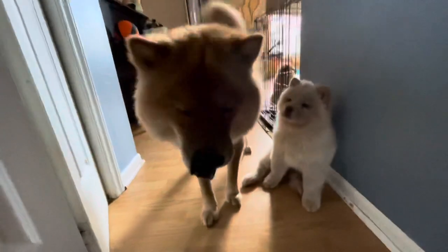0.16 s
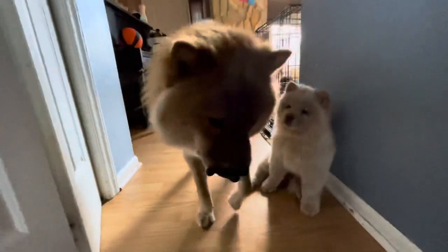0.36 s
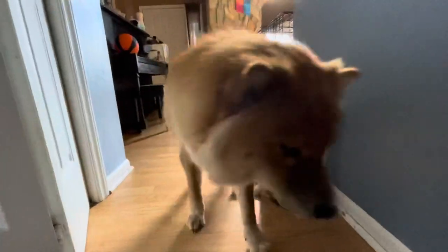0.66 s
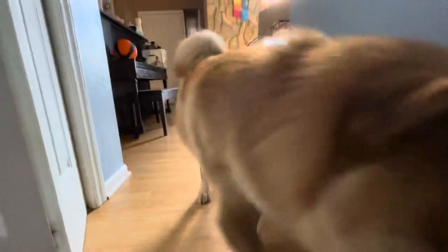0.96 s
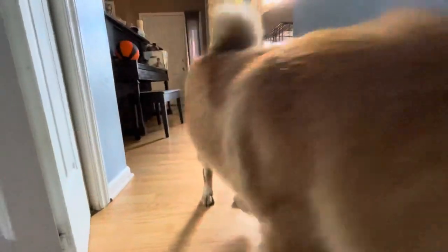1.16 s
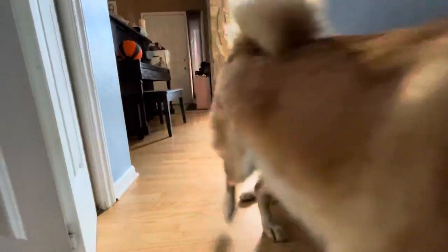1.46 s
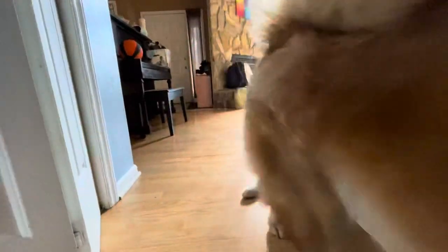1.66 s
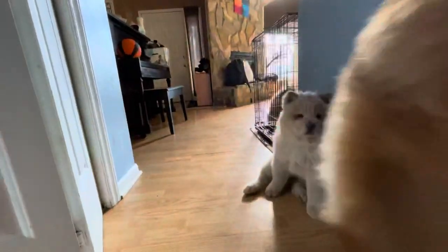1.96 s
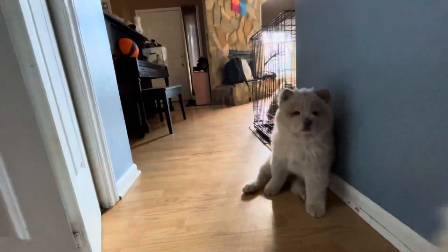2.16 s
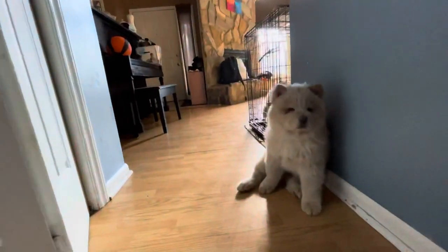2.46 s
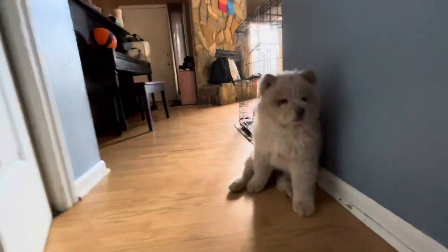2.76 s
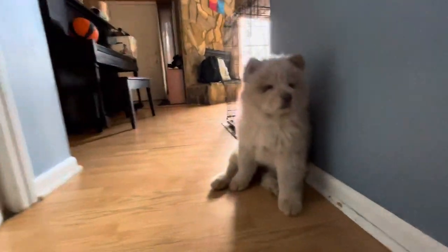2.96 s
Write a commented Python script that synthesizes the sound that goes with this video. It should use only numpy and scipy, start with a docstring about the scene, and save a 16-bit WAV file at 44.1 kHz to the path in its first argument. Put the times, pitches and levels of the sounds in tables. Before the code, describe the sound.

Dog claws click and skid unevenly on a wooden hallway floor, with soft paw thumps beneath.

```python
"""First the hissing, mid-toned tail of an earlier contact dies away over a low rumble.
Then a big dog runs on a wooden hallway floor: claws click and skid unevenly as coloured noise bursts
with short rings, at the two microphone ports. Paw pads, taps and a hollow board are damped swings.
The hallway answers every contact from 3.4 ms on, about 1.2 m of extra path, with decaying noise.
The ports differ in level, and in a phase lag that broadly grows with frequency."""
import sys
import numpy as np
from scipy import signal
from scipy.fft import rfft, irfft, next_fast_len
from scipy.io import wavfile
from scipy.ndimage import uniform_filter1d, map_coordinates

SR = 44100
rng = np.random.default_rng(int(sys.argv[2]) if len(sys.argv) > 2 else 0)


def master(y):
    """Save y as 16-bit WAV."""
    cut = np.clip(np.atleast_2d(y).T, -1, 1)
    pcm = np.round(cut * 32767)  # scale
    wavfile.write(sys.argv[1], SR, pcm.astype(np.int16))


N = 136710  # samples, 3.1 s


def amp(db):
    """Decibels to gain."""
    return 10 ** (np.asarray(db) / 20)


def unit(x):
    """Scale to rms 1."""
    return x / np.sqrt(np.mean(x ** 2) + 1e-20)


def along(points, hz):
    """Read a (frequency, value) table on a log frequency axis."""
    f, values = np.transpose(points)
    return np.interp(np.log(hz + 1), np.log(f + 1), values)


def wobble(rate, size):
    """A smooth random curve with rate knots a second."""
    knots = rng.standard_normal(int(size * rate / SR) + 4)
    return map_coordinates(knots, [np.arange(size) * rate / SR])


def filtered(x, response):
    """Multiply the spectrum of x by a response of frequency, which may turn phase."""
    m = next_fast_len(x.shape[-1] + 2048)
    spectrum = rfft(x, m) * response(np.fft.rfftfreq(m, 1 / SR))
    return irfft(spectrum, m)[..., :x.shape[-1]]


def add(track, start_s, sound):
    """Mix a sound into the track at start_s seconds."""
    part = track[..., round(start_s * SR):round(start_s * SR) + sound.shape[-1]]
    part += sound[..., :part.shape[-1]]


# How alike noise reaches the two microphone ports: (frequency [Hz], correlation [0-1])
PORT_LIKENESS = [(60, .85), (150, .75), (300, .3), (600, .45), (2500, .62), (5000, .6), (8500, .9),
                 (10500, .8), (12000, .62)]


def port_noise(level_db, size, alike=1):
    """Two-port noise of rms 1: a shared part and an opposed part set how alike the ports are."""
    def shared_and_opposed(hz):
        turn = np.arccos(np.clip(alike * along(PORT_LIKENESS, hz), 0, 1)) / 2
        return amp(level_db(hz)) * [np.cos(turn), np.sin(turn)]
    mid, side = filtered(rng.standard_normal((2, size)), shared_and_opposed)
    return unit(np.array([mid + side, mid - side]))


def patchy(x, depth_db):
    """Random gain in small patches of time and frequency makes steady noise uneven."""
    z = signal.stft(x, nperseg=1024)[2]
    field = uniform_filter1d(rng.standard_normal(z.shape[1:]), size=4, axis=0)
    field = uniform_filter1d(field, size=3, axis=1)
    return unit(signal.istft(z * amp(depth_db * unit(field)), nperseg=1024)[1][:, :N])


# Background level, at first the tail of an earlier contact:
# (time [s], hiss level [dB], mid band level [dB])
AIR_LEVELS = [(0, -50, -52.5), (.1, -52.5, -62), (.17, -60, -66), (.3, -61, -73.5), (.45, -57.5, -66),
              (0.597, -69.5, -71), (.72, -53, -58.5), (.87, -73.5, -84), (.93, -63.5, -69.5),
              (1.25, -59, -60), (1.44, -61.5, -68), (1.6, -57.5, -72), (2.05, -60.5, -57.5),
              (2.25, -62, -69), (2.45, -57, -61.5), (2.59, -62.5, -74), (2.75, -58.5, -62.5),
              (3.1, -67, -70.5)]
# Colours of hiss, mid band and rumble: (frequency [Hz], relative level per Hz [dB])
HISS_COLOUR = [(1200, -79), (2000, -3.5), (3500, -2.5), (5500, -0.5), (8000, -4.5), (10800, -5),
               (12500, -4.5)]
MID_COLOUR = [(150, -2.5), (260, -6), (400, 0.5), (650, -2), (1100, -5.5), (2000, -17.5), (3000, -49)]
RUMBLE_COLOUR = [(25, -44), (38, -2), (52, 0), (110, 2), (150, -9.5), (260, -21), (400, -106)]
RUMBLE_DB = -61


def air():
    """Hiss, a lumpy mid band and rumble: coloured noise layers, each swelling on its own."""
    times, hiss_db, mid_db = np.transpose(AIR_LEVELS)
    rumble_db = np.full(len(times), RUMBLE_DB)
    # level, colour, swell spread in dB, patch spread in dB
    layers = [(hiss_db, HISS_COLOUR, 1.2, 1.5), (mid_db, MID_COLOUR, 3, 5),
              (rumble_db, RUMBLE_COLOUR, 1.3, 1.3)]
    out = np.zeros((2, N))
    for levels_db, colour, swell_db, patch_db in layers:
        noise = port_noise(lambda hz: along(colour, hz), size=N)
        level_db = np.interp(np.arange(N) / SR, times, levels_db)
        gain = amp(level_db + swell_db * wobble(21, size=N))
        out += gain * patchy(noise, patch_db)
    return out


# Decay of the hallway's answer: (frequency [Hz], time to fall 60 dB [s])
HALL_DECAY = [(60, 0.19), (500, 0.19), (2000, 0.31), (5000, 0.29), (11000, 0.14)]
HALL_DELAY_S = 0.0034
HALL_ALIKE = .6  # the answer reaches the ports less alike than the direct sound
GRAIN_DB = 2  # spread of separate echoes in the tail


def hallway(sources):
    """The answer is decaying noise, each frequency at its own speed; each quarter second gets a new tail."""
    out, step = np.zeros((2, N)), SR // 4
    for start in range(0, N, step):
        noise = port_noise(lambda hz: 0 * hz, size=SR // 2, alike=HALL_ALIKE)
        hz, t, z = signal.stft(noise, SR, nperseg=256)
        decay = amp(-60 * t / along(HALL_DECAY, hz)[:, None])
        tail = signal.istft(z * decay, SR, nperseg=256)[1]
        tail = tail * amp(GRAIN_DB * wobble(142, size=tail.shape[1]))
        tail = tail / np.linalg.norm(tail[0])
        heard = sources[:, start:start + step].mean(0)[None]
        add(out, start / SR + HALL_DELAY_S, signal.fftconvolve(heard, tail, axes=1))
    return out


def knock(hz, t60, rise_s, sag):
    """A damped swing of the boards that starts the share sag sharp and settles to hz."""
    t = np.arange(SR // 3) / SR
    pitch = hz * (1 + sag * np.exp(-t * hz / 2))
    swing = np.sin(2 * np.pi * np.cumsum(pitch) / SR)
    return swing * amp(-60 * t / t60) * (1 - np.exp(-t / rise_s))


# A claw touching a hollow board: (time [s], level [dB])
TOUCH_TIMES = [(0.35, -46.5), (.3605, -50)]
# Modes of the hollow board: (frequency [Hz], relative level [dB])
HOLLOW_MODES = [(1710, -8.5), (2510, 2), (3010, 1.5), (3820, -1.5)]
TAP_T60_S, TAP_RISE_S, TAP_SAG = .03, .0012, .12


def hollow_board():
    """A claw sets off all modes of a hollow board at once, their balance a little new each time."""
    out = np.zeros(N)
    for start_s, db in TOUCH_TIMES:
        for hz, mode_db in HOLLOW_MODES:
            level = amp(db + mode_db + rng.normal(0, 1))
            add(out, start_s, level * knock(hz, TAP_T60_S, TAP_RISE_S / 2, 0))
    return out


# Soft taps on the boards: (time [s], level [dB], settled pitch [Hz])
SOFT_TAPS = [(.186, -47, 620), (.377, -43, 650), (.48, -43, 625), (.52, -42, 800), (.934, -40, 690),
             (1.0955, -35, 1000), (1.1518, -31.5, 1176), (1.562, -45.5, 530), (1.6, -42.5, 805),
             (2.353, -45, 550), (2.415, -42, 647), (2.494, -45.5, 863), (2.532, -52.5, 844),
             (2.843, -43, 543)]


def taps():
    """Light contacts make the boards swing briefly at a middle pitch."""
    out = np.zeros(N)
    for start_s, db, hz in SOFT_TAPS:
        add(out, start_s, amp(db) * knock(hz, TAP_T60_S, TAP_RISE_S, TAP_SAG))
    return out


# Paw pads: (time [s], level [dB], settled pitch [Hz], time to fall 60 dB [s], joist boom level [dB])
PAW_PADS = [(0.187, -46, 134, 0.12, -78), (.43, -57, 90, 0.11, -51), (0.469, -43.5, 76, 0.18, -56),
            (0.669, -40, 97.5, 0.14, -43), (.727, -37, 77.6, 0.16, -56), (0.925, -44.5, 144, 0.15, -47),
            (1.101, -48, 93, 0.19, -47), (1.18, -42.5, 104, 0.13, -43), (1.323, -32, 109.5, 0.056, -43.5),
            (1.49, -35, 99.7, 0.14, -40.5), (1.718, -37.5, 142, 0.05, -64), (1.878, -39.5, 109, 0.14, -42),
            (2.028, -39.5, 79.6, 0.1, -51), (2.149, -46, 126, 0.11, -58), (2.302, -47, 89, 0.17, -42.5),
            (2.359, -33.5, 131, 0.025, -69), (2.416, -52, 135, 0.051, -55),
            (2.536, -36.5, 174, 0.038, -50.5), (2.614, -50, 93.6, 0.15, -73),
            (2.709, -38, 87.5, 0.058, -53.5)]
PAD_RISE_S, PAD_SAG = 0.008, 0.25  # a soft landing
JOIST_HZ, JOIST_T60_S, JOIST_RISE_S, JOIST_SAG = 51.6, 0.37, 0.013, 0.13


def paw_pads():
    """A soft pad makes the boards swing low, and the joists below boom longer and lower still."""
    out = np.zeros(N)
    for start_s, db, hz, t60, boom_db in PAW_PADS:
        joist_hz = JOIST_HZ * rng.normal(1, 0.0079)
        add(out, start_s, amp(db) * knock(hz, t60, PAD_RISE_S, PAD_SAG))
        add(out, start_s, amp(boom_db) * knock(joist_hz, JOIST_T60_S, JOIST_RISE_S, JOIST_SAG))
    return out


LOW_HZ, TREBLE_HZ = 1800, 7060  # edges of the low and treble parts


def treble_share(hz):
    """Smooth step that passes what lies above the treble edge."""
    return 1 / (1 + (TREBLE_HZ / (hz + 1)) ** 6)


# Shared colour of the claw contacts: (frequency [Hz], relative level per Hz [dB])
CLAW_COLOUR = [(300, -16), (800, -8.5), (1700, -11.5), (3300, 3), (5500, 2.5), (7500, 4), (8800, 3),
               (10800, 5.5), (12000, 3.5), (14000, -2)]
LUMP_DB, LUMP_HZ = 2.5, 450  # each spot of the boards colours anew: spread, spacing
TREBLE_LASTS = 0.36  # share of the contact's decay time that the treble keeps
CHATTER_DB = 3.5  # spread of unevenness inside a contact
CREST_DB = 7  # allowance for the peak of a burst over its running level
# faint noise that swells just before each landing and fades just after: level, swell time
SWELL_DB, SWELL_S = -13.5, 0.0021
LEAD_IN_S = .03  # span kept for the faint swell before the landing


def claw_burst(t, rise, fall_db, treble_db, low_db):
    """A faint swell, then chattering noise coloured by the boards, its treble dying first."""
    lumps_db = LUMP_DB * rng.standard_normal(SR // LUMP_HZ)

    def colour_db(hz):
        tilt_db = treble_db * treble_share(hz) + low_db / (1 + (hz / LOW_HZ) ** 6)
        return along(CLAW_COLOUR, hz) + tilt_db + map_coordinates(lumps_db, [hz / LUMP_HZ])

    noise = port_noise(colour_db, size=len(t))
    treble = filtered(noise, treble_share)
    body = (noise - treble) * amp(fall_db) + treble * amp(fall_db / TREBLE_LASTS)
    faint_swell = amp(SWELL_DB) * np.exp(-np.abs(t) / SWELL_S) * noise
    burst = rise * body + faint_swell
    rough = burst * amp(CHATTER_DB * wobble(1099, size=len(t)))
    return rough * np.linalg.norm(burst) / np.linalg.norm(rough)  # chatter keeps the energy


RING_CYCLES = 62  # swings of the claw's ring until it is 60 dB down


def claw_ring(t, rise, hz):
    """The claw rings as a damped sine whose phase wavers partly apart at the two ports."""
    shared = wobble(300, size=len(t))
    apart = np.array([wobble(300, size=len(t)), wobble(300, size=len(t))])
    decay = amp(-60 * np.maximum(t, 0) * hz / RING_CYCLES)
    return rise * decay * np.sin(2 * np.pi * hz * t + .4 * shared + .4 * apart)


# Claw contacts, quick ticks and then skids, most with a slower swell:
# (time [s], level [dB], ring pitch [Hz], treble tilt [dB], low tilt [dB],
#  rise [ms], time to fall 60 dB [ms], ring relative to contact [dB])
CLAW_TICKS = [(0.2045, -35, 5360, 2.5, 7, 0.42, 21, -21), (0.219, -27.5, 5230, 3.5, 6, 0.79, 22, -13.5),
              (0.281, -41, 5060, 2, -9, 0.87, 28, -2.5), (0.3507, -37.5, 5930, -1, -3, 0.5, 24, -11),
              (0.4032, -35, 2410, 7, 15.5, 1.7, 28, -20), (0.4161, -27, 6300, -1.5, 9.5, 0.21, 37, 1),
              (0.4474, -36, 3900, 1.5, 13, 1.2, 30, -6), (0.4895, -41, 4970, -17, 5, 0.89, 18, -3),
              (0.5182, -30.5, 2283, -8.5, -6, 1.06, 26, -2.5), (0.665, -42.5, 5570, 4, 15, 0.37, 38, -5),
              (0.6851, -33.5, 3940, -6.5, -19, 1.5, 38, -30), (0.7376, -30.5, 4850, -2, 2, 0.6, 35, -5),
              (0.9137, -37, 4820, -7, 14.5, 1, 53, 0), (0.9783, -29, 4680, -4, 1, 1.04, 31, -5.5),
              (1.0953, -19.5, 5900, 2.5, 7, 1.1, 33, -14.5), (1.1514, -13.5, 4330, 6.5, 3, 0.42, 31, -10),
              (1.2189, -26, 4970, -5, -3.5, 0.84, 22, -24), (1.3157, -43.5, 5200, -5.5, 7, 0.82, 83, -18),
              (1.3558, -35, 4770, 2, 1, 0.47, 35, -7), (1.3651, -28.5, 5240, -5.5, 0.5, 0.36, 13, -11),
              (1.5693, -28.5, 4900, 4.5, 12, 0.98, 29, -9), (1.5992, -28, 5820, 2.5, 9, 0.6, 96, -3.5),
              (1.6088, -26.5, 5200, 4, -3, 0.71, 50, -3.5), (1.6703, -34, 5670, -2.5, 7, 0.53, 59, 1),
              (1.7711, -35.5, 3170, -2.5, -3, 0.77, 36, -6), (1.905, -37.5, 3940, 2, 19, 0.57, 15, 3),
              (2.0252, -30.5, 6130, 1, 10.5, 1, 84, -1.5), (2.0963, -30.5, 3360, -15.5, 1.5, 0.49, 15, -34),
              (2.17, -39.5, 3650, -6.5, 12, 0.81, 58, -28), (2.197, -37.5, 4700, -5.5, 8, 1, 74, -5),
              (2.2711, -34, 3600, -14, -12, 0.37, 34, -23), (2.4067, -28, 5840, -2.5, 3, 1.6, 31, -7.5),
              (2.6907, -34.5, 4580, -12, 1.5, 0.76, 80, -6), (2.8421, -30, 4400, -13, -1, 0.66, 22, -15),
              (2.9299, -38, 2650, -50, -3.5, 1.1, 44, -5.5), (3.0492, -45, 5100, 0, -6, 0.38, 9.8, -29)]
CLAW_SKIDS = [(0.422, -30.5, 4030, 0, 7, 1.8, 48, -11), (0.47, -36, 3470, -6.5, 2, 7.4, 39, -27),
              (0.702, -39.5, 3420, -17, 13.5, 3, 36, -20), (0.8093, -38.5, 4020, -19, -13, 7.2, 50, 4.5),
              (0.8544, -53.5, 2220, 7, 11, 1.2, 55, 0), (0.9324, -33, 4800, 5, 14, 5.4, 40, -7),
              (1.079, -35.5, 4960, -2, 11, 3.8, 41, -25), (1.1084, -27.5, 3500, 3, 6, 2.3, 37, -33),
              (1.165, -30.5, 4320, -8, -10, 3.7, 43, -7), (1.4726, -39, 3160, -24, 9.5, 2, 94, -29),
              (1.4902, -28.5, 2460, -6, 5.5, 1.2, 82, -7), (1.5459, -22.5, 6400, 21.5, 8, 11, 73, -22),
              (1.8719, -27.5, 3750, -6, 1, 3.2, 30, -20), (1.8872, -18.5, 4550, -1, -21, 3.7, 19, -3.5),
              (1.8926, -16, 3560, 3.5, -2.5, 3.4, 22, -12.5), (2.28, -34, 3430, -7, -5, 3, 34, -1),
              (2.2869, -24, 4900, 2, 4.5, 7.9, 34, -11), (2.2987, -18.5, 3310, -1.5, -4.5, 2.4, 48, -5),
              (2.371, -32.5, 4550, 3, 3, 2.8, 28, -13), (2.4814, -31.5, 3465, -9, 3.5, 4.7, 21.5, -10),
              (2.71, -27.5, 4400, -4, -1, 6.6, 67, -14)]


def claws():
    """Every tick or skid is a noise burst plus a ring, kept apart so the hallway can answer the burst."""
    bursts, rings = np.zeros((2, N)), np.zeros((2, N))
    t = np.arange(SR // 8) / SR - round(LEAD_IN_S * SR) / SR  # zero at the landing
    after_ms = np.maximum(t, 0) * 1000
    for start_s, db, hz, treble_db, low_db, rise_ms, t60_ms, ring_db in CLAW_TICKS + CLAW_SKIDS:
        rise = 1 - np.exp(-(after_ms / rise_ms) ** 2)
        fall_db = -60 * after_ms / t60_ms
        rise = rise / np.max(rise * amp(fall_db))  # rise and fall together peak at 1
        burst = claw_burst(t, rise, fall_db, treble_db, low_db)
        add(bursts, start_s + t[0], amp(db - CREST_DB) * burst)
        add(rings, start_s + t[0], amp(db + ring_db) * claw_ring(t, rise, hz))
    return bursts, rings


HALL_DB, PAD_HALL_DB = -6, -11.5  # what the claws and the thumps send into the hallway


def scene():
    """The air, the hallway's answer, the thumps on the boards and the claws."""
    background = air()
    boards = hollow_board() + taps() + paw_pads()
    thumps = np.array([boards, boards])
    bursts, rings = claws()
    answer = hallway(amp(HALL_DB) * bursts + amp(PAD_HALL_DB) * thumps)
    return background + answer + thumps + bursts + rings


# Level of the left port over the right: (frequency [Hz], difference [dB])
PORT_LEAN = [(60, 5), (110, 1), (200, 6.5), (360, 3.5), (650, 8.5), (1180, -0.5), (2140, 2), (3880, 0.5),
             (7040, -1), (12800, 0)]
# Phase by which the left port leads: (frequency [Hz], lead [rad])
PORT_LEAD = [(0, 0), (260, 0.4), (860, 4.4), (1290, 3.9), (1810, 6.3), (2330, 4.5), (3270, 5.0),
             (3960, 6.8), (5080, 12.7), (7750, 15.1), (9220, 15.4), (10200, 16.0), (11800, 18.8),
             (12900, 18.9)]
# Microphone response: (frequency [Hz], gain [dB])
MIC_RESPONSE = [(11500, 1.5), (11900, -19.5), (12200, -8.5), (13300, -34)]
TOP_HZ = 13383  # nothing passes from here up


def record(dry):
    """Two microphone ports split a level and phase difference evenly, under a steep band limit."""
    lead_hz, lead = np.transpose(PORT_LEAD)

    def ports(hz):
        half_turn = np.exp(.5j * np.interp(hz, lead_hz, lead))
        left = amp(along(PORT_LEAN, hz) / 2) * half_turn
        return np.array([left, 1 / left]) * amp(along(MIC_RESPONSE, hz)) * (hz < TOP_HZ)

    return filtered(dry, ports)


dry = scene()
out = record(dry)
master(out)
```